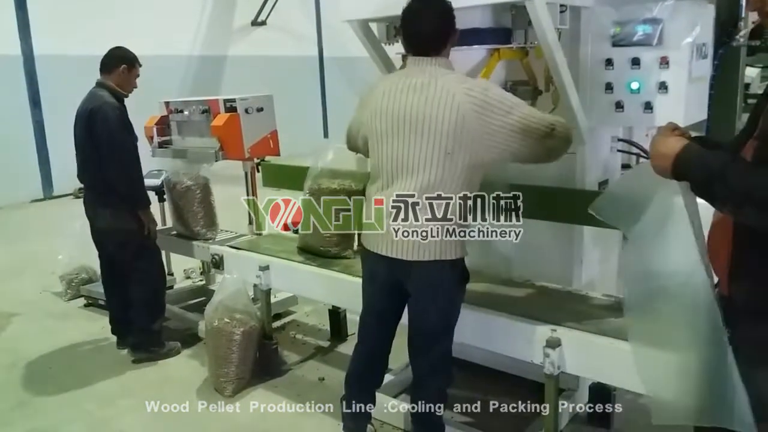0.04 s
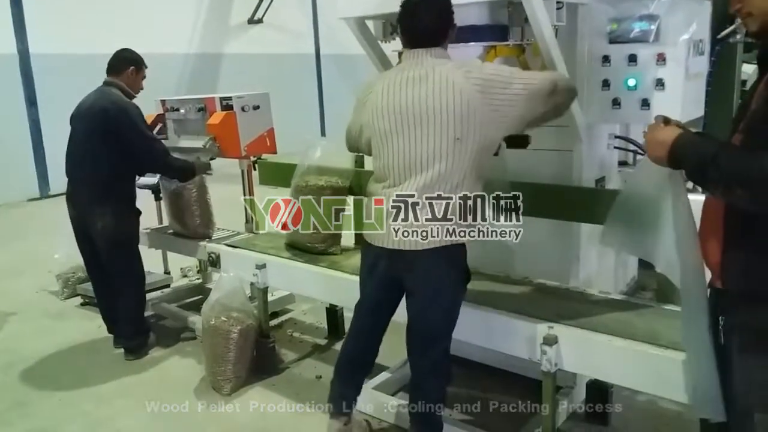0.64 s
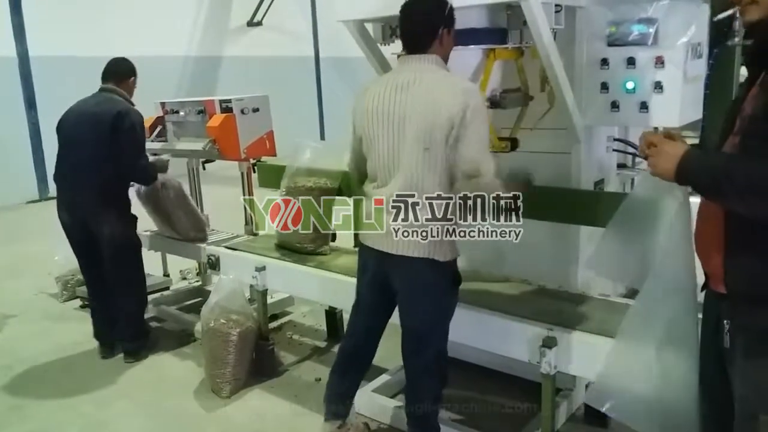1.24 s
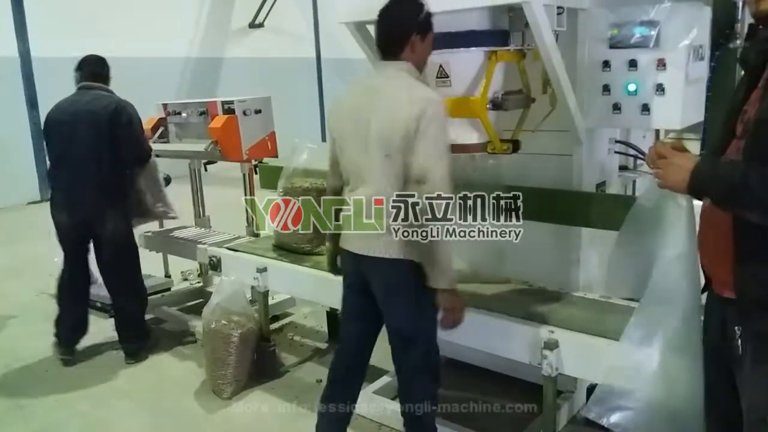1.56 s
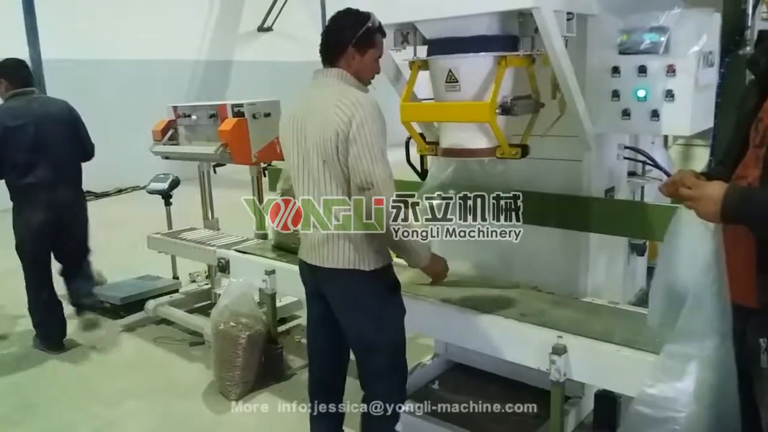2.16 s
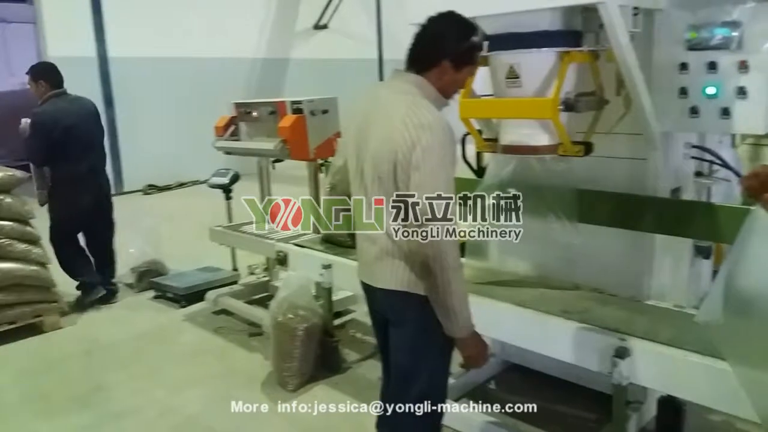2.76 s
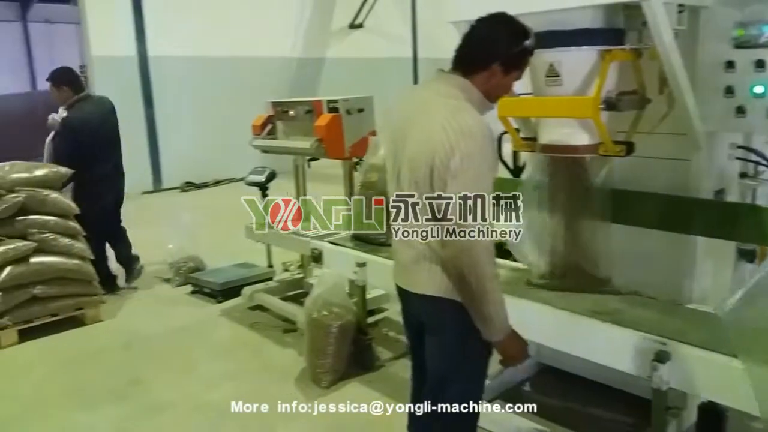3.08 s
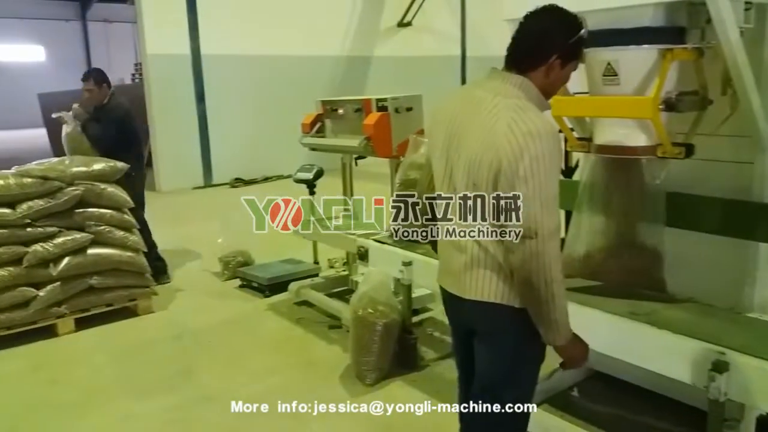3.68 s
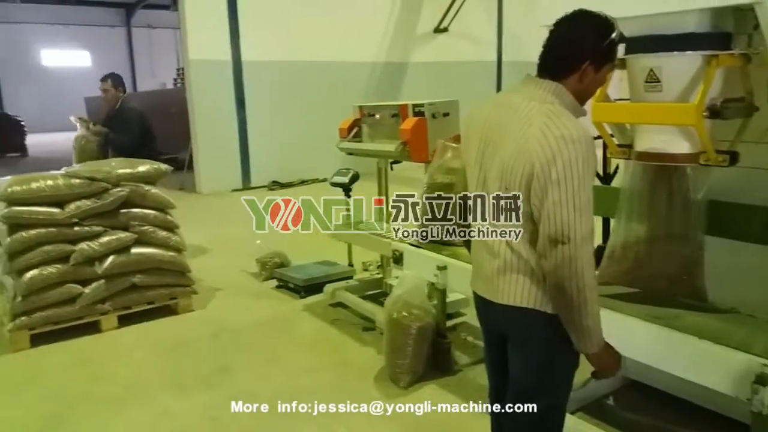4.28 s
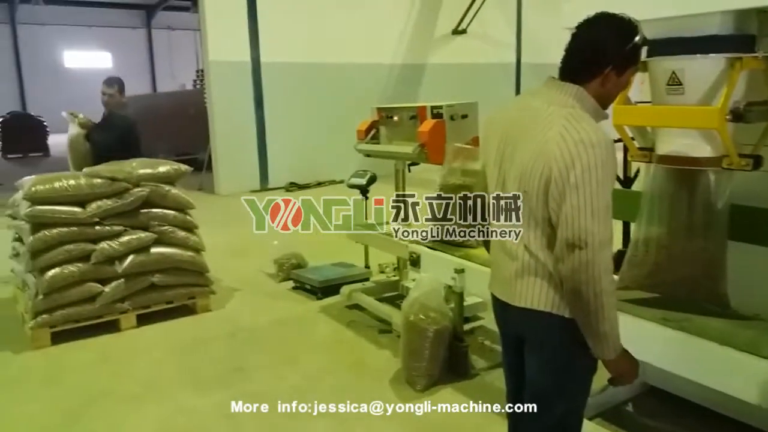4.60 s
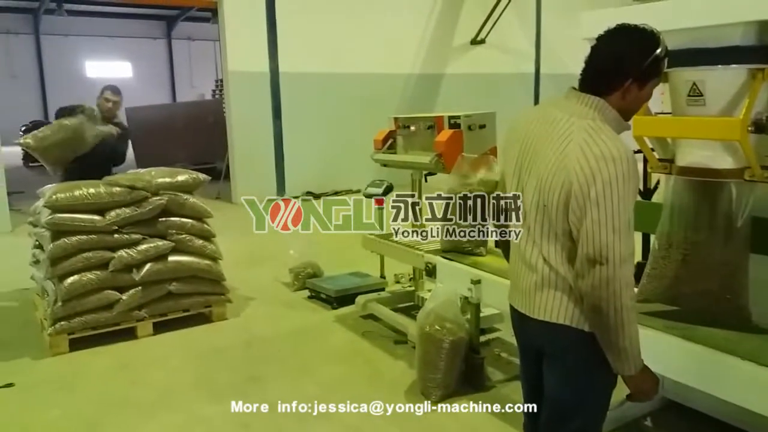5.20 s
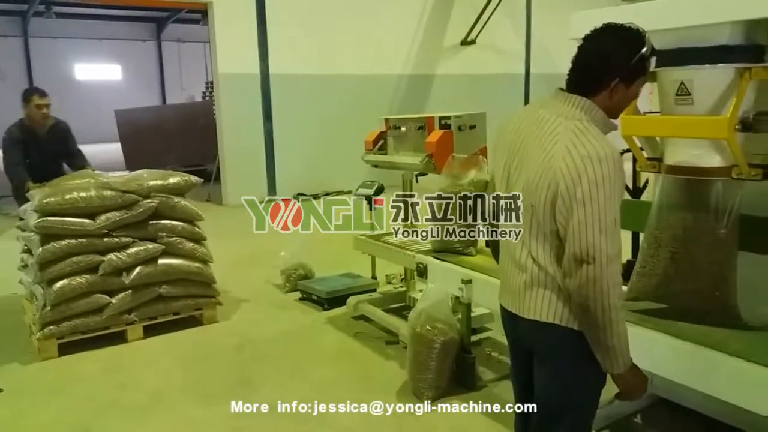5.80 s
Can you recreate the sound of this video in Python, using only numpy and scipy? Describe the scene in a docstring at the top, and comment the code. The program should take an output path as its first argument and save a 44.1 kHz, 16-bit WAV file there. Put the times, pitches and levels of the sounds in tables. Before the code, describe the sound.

Motors and fans drone steadily in a large factory hall. Close by, a plastic bag rustles briefly, and a bagging machine lets out a sharp hiss of air with a few dull knocks. After a second, shorter hiss, a metal gate clanks open and pellets drum into the empty bag. They keep rattling down a ringing steel chute in a loud, steady rush, until another clank comes at the very end.

```python
"""A large factory hall, motors droning all round, with a pellet bagging machine up close.
A plastic bag rustles and air valves blow off as the clamp grips it. The hopper gate clanks open
and the load drums into the empty bag. Pellets then keep rattling down the steel chute and set it
ringing, while the growing heap deadens the bag."""
import sys
import numpy as np
from scipy import signal
from scipy.fft import rfft, irfft
from scipy.io import wavfile
from scipy.ndimage import uniform_filter1d, minimum_filter1d

SR = 44100
rng = np.random.default_rng(int(sys.argv[2]) if len(sys.argv) > 2 else 0)


def persist_wave(psi):
    """Save psi, clipped to +-1, as 16-bit WAV."""
    counts = np.round(np.clip(psi, -1, 1) * 32767).astype(np.int16)
    wavfile.write(sys.argv[1], SR, np.atleast_2d(counts).T)


N = 257544
TIME = np.arange(N) / SR
GATE_OPEN_S = 2.561


def from_db(db):
    """Decibels to gain."""
    return 10 ** (np.asarray(db) / 20)


def unit_rms(x):
    """Scale to an rms of 1."""
    return x / np.sqrt(np.mean(x ** 2) + 1e-20)


def at_hz(points, hz):
    """Read a curve on a log-frequency axis."""
    freqs, values = np.transpose(points)
    return np.interp(np.log(np.maximum(hz, 1)), np.log(freqs), values)


def noise():
    """White noise."""
    return rng.standard_normal(N)


def drift(rate_hz):
    """Smooth random modulation with a spread of about 1."""
    step, warm_up = 40, 2000
    pole = np.exp(-2 * step * np.pi * rate_hz / SR)
    white = rng.standard_normal(N // step + warm_up + 2)
    slow = signal.lfilter([1], [1, -2 * pole, pole * pole], white)[warm_up:]
    return np.interp(np.arange(N) / step, np.arange(len(slow)), unit_rms(slow))


def colour(x, spectrum):
    """Minimum-phase EQ, so nothing rings ahead of a hit; rms 1."""
    size = 8192
    gains = from_db(at_hz(spectrum, np.fft.rfftfreq(size, 1 / SR)))
    cepstrum = irfft(np.log(gains))
    cepstrum[1:size // 2] *= 2
    cepstrum[size // 2 + 1:] = 0
    impulse = irfft(np.exp(rfft(cepstrum)))
    return unit_rms(signal.fftconvolve(x, impulse)[:N])


def resonate(x, modes):
    """Parallel resonators of alternating polarity, each at its own level; rms 1 in all."""
    out = 0
    for k, (hz, width, db) in enumerate(modes):
        pole = np.exp(-np.pi * width / SR)
        ring = signal.lfilter([1, 0, -1], [1, -2 * pole * np.cos(2 * np.pi * hz / SR), pole * pole], x)
        out = out + (-1) ** k * from_db(db) * unit_rms(ring)
    return unit_rms(out)


def treble_shelf(x, lift_db, corner_hz):
    """Gentle boost or cut above the corner."""
    low = signal.sosfilt(signal.butter(1, corner_hz, fs=SR, output="sos"), x)
    return low + from_db(lift_db) * (x - low)


def burst(start, rise, hold, decay):
    """Attack and decay envelope in seconds; the hold counts from the start."""
    age = TIME - start
    return np.clip(age / rise, 0, 1) * np.exp(-np.maximum(age - hold, 0) / decay)


def fade_in(rise_s):
    """Linear fade up from the moment the gate opens."""
    return np.clip((TIME - GATE_OPEN_S) / rise_s, 0, 1)


def settle(first, last, lag_s):
    """Glide from one value towards another once the gate is open."""
    return last + (first - last) * np.exp(-np.maximum(TIME - GATE_OPEN_S, 0) / lag_s)


def impacts(per_s, spread_db):
    """Clicks of random timing, strength and polarity."""
    sizes = from_db(spread_db * np.minimum(rng.exponential(1, N), 4.5)) * rng.choice([-1, 1], N)
    return sizes * (rng.random(N) < per_s / SR)


def housing(x, reflect_db, decay_s):
    """Steel panels close by add a dense, very short echo that ripples the spectrum; rms 1."""
    age = TIME[:SR // 10]
    tail = rng.standard_normal(len(age)) * np.exp(-age / decay_s) * (age > .001)
    echo = signal.fftconvolve(x, tail / np.sqrt(np.sum(tail ** 2)))[:N]
    return unit_rms(x + from_db(reflect_db) * echo)


def hall(x):
    """Diffuse reverb: each octave dies at its own rate, and the far walls return little treble."""
    # Each row: frequency in Hz, seconds to fall by 60 dB.
    reverb_times = [(100, 4.5), (700, 5.4), (2000, 4.2), (4000, 2.34), (8000, 0.4), (15000, 0.22)]
    age = TIME[:3 * SR]
    edges = np.geomspace(60, 16000, 9)
    tail = 0
    for low, high in zip(edges, edges[1:]):
        octave = signal.butter(2, [low, high], "band", fs=SR, output="sos")
        band = signal.sosfilt(octave, rng.standard_normal(len(age)))
        tail = tail + band * np.exp(-np.log(1000) * age / at_hz(reverb_times, np.sqrt(low * high)))
    tail = tail * np.clip(age / 0.024, 0, 1)
    echo = signal.fftconvolve(x, tail / np.sqrt(np.sum(tail ** 2)))[:N]
    return treble_shelf(echo, lift_db=-12.5, corner_hz=4500)


def machinery(start_db=-28.5, settled_db=-32, ease_s=2.2, waver_db=2.0, wander_hz=1.99):
    """Fans and motors: a bed of roar that eases to a steady level, with wavering tones."""
    # EQ of the roar. Each row: frequency in Hz, relative level in dB.
    roar_eq = [(25, -55), (40, -14), (55, -5), (80, -3), (250, -2.5), (370, -9.5), (630, -10.5),
               (1100, -11), (2600, -14), (3700, -23.5), (5200, -27.5), (7000, -39.5), (9000, -59),
               (14000, -100)]
    # Each row: pitch in Hz, rms level in dB.
    motor_tones = [(156.1, -45), (188.4, -41), (250, -44), (535, -54), (640.6, -53), (842, -53),
                   (1412, -55), (1523, -54)]
    eased = np.minimum(TIME / ease_s, 1) ** 2
    roar = from_db(start_db + (settled_db - start_db) * eased) * colour(noise(), roar_eq)
    hum = 0
    for hz, db in motor_tones:
        level = from_db(db + waver_db * drift(7.4))
        cycles = np.cumsum(hz + wander_hz * drift(3.94)) / SR
        hum = hum + level * np.sin(2 * np.pi * cycles)
    return roar + np.sqrt(2) * hum


def groan(hz=594, width_hz=6, level_db=-36.5):
    """A hollow note swells in the machine after the clamp has closed and slowly dies away."""
    note = resonate(noise(), [(hz, width_hz, 0)])
    return from_db(level_db) * note * burst(start=0.67, rise=0.26, hold=0.26, decay=0.53)


def frame():
    """The frame shudders when a cylinder strokes or the load lands."""
    # EQ of the rumble. Each row: frequency in Hz, relative level in dB.
    rumble_eq = [(28, -51), (55, 1), (90, 11), (140, -6), (300, 0.5), (450, -14), (610, -11.5), (1100, -30),
                 (2500, -89)]
    # Each row: start in seconds, level in dB, rise and decay in seconds.
    shudders = [(.9, -29, 0.021, 0.35), (2.41, -25, 0.0064, 0.12), (2.68, -21, 0.089, 0.056),
                (5.74, -33, 0.021, 0.064)]
    envelope = sum(from_db(db) * burst(s, rise, rise, decay) for s, db, rise, decay in shudders)
    return colour(noise(), rumble_eq) * envelope


def plastic(ring_hz=2160, ring_width_hz=90, ring_db=-14.0):
    """The film crackles in dense little snaps, with a faint ring, as a bag is handled."""
    # EQ of the crackle. Each row: frequency in Hz, relative level in dB.
    film_eq = [(250, -5), (400, 10.5), (600, -7.5), (900, -17), (1250, -11.5), (2100, 5), (3400, 1),
               (4200, 2.5), (5300, -1.5), (6200, -12), (7800, -16.5), (10500, -35), (12600, -21),
               (15500, -34)]
    # Each row: start and length in seconds, level in dB.
    rustles = [(0, 0.096, -30), (0.117, 0.029, -36), (0.176, 0.018, -38.5), (0.294, 0.026, -46),
               (0.387, .02, -47), (.49, 0.022, -47), (1.856, 0.011, -43.5)]
    snaps = colour(impacts(7000, spread_db=4.0), film_eq)
    crackle = unit_rms(snaps + from_db(ring_db) * resonate(snaps, [(ring_hz, ring_width_hz, 0)]))
    return crackle * sum(from_db(db) * burst(s, 0.0017, length, 0.021) for s, length, db in rustles)


def air_valves(ports_db=-4.0, flutter_db=0.5, whistle_db=-24):
    """Jets of compressed air excite the valve ports; a valve whistles as the first blast runs out."""
    # EQ of the escaping air. Each row: frequency in Hz, relative level in dB.
    hiss_eq = [(300, -3.5), (720, 1), (1170, -6.5), (1900, 2.5), (2300, -0.5), (2750, 2), (4300, -5),
               (5200, -7.5), (6000, -8), (7300, -19), (8900, -22.5), (9600, -29.5), (10700, -48.5),
               (11900, -32), (13500, -35), (15200, -28)]
    # Resonances of ports and whistle. Each row: pitch and width in Hz, relative level in dB.
    port_modes = [(2030, 240, 4.5), (2650, 210, 1.5), (2900, 260, -3.5), (3190, 90, -9), (4810, 180, -3),
                  (5300, 130, -0.5), (5900, 200, -4), (6600, 80, -14), (8250, 90, -20), (9260, 60, -20)]
    whistle_modes = [(2520, 90, -2.5), (5150, 110, -2)]
    # Each row: start and length in seconds, level in dB, growth in dB a second, treble lift in dB.
    exhausts = [(0.618, 0.19, -21.5, 8.5, 1.5), (0.815, 0.049, -22.5, 6, -22),
                (2.409, 0.04, -26.5, -8, 1.5), (2.452, 0.089, -31, -15, -26)]
    hiss = housing(colour(noise(), hiss_eq), reflect_db=-25, decay_s=0.02)
    ports = from_db(ports_db) * resonate(colour(noise(), hiss_eq), port_modes)
    jet = unit_rms(hiss + ports) * from_db(flutter_db * drift(25))
    whistle = from_db(whistle_db) * resonate(colour(noise(), hiss_eq), whistle_modes)
    out = whistle * burst(start=0.815, rise=0.017, hold=0.026, decay=0.015)
    for s, length, db, growth, lift_db in exhausts:
        flow = from_db(db + growth * np.clip(TIME - s, 0, length)) * burst(s, 0.018, length, 0.013)
        out = out + flow * treble_shelf(jet, lift_db, corner_hz=4970)
    return out


def gate():
    """Each clank is a quick clatter of contacts that rings the hopper gate."""
    # Each row: pitch and width in Hz, relative level in dB.
    gate_modes = [(181, 87, -1.5), (400, 320, -1.5), (830, 130, -7.5), (1940, 270, -5.5), (2870, 470, -5),
                  (5340, 2000, -10.5)]
    # Each row: start in seconds, level in dB, decay in seconds, treble lift in dB.
    clanks = [(2.558, -11.5, 0.029, -15), (2.606, -17, 0.014, 10), (2.65, -19, 0.058, -15),
              (5.827, -8, .03, 0)]
    # Each row: frequency in Hz, relative level in dB.
    strike_eq = [(100, 13.0), (5500, -12.5), (10000, -27), (15000, -52)]
    clatter = resonate(colour(impacts(3000, spread_db=-6.5), strike_eq), gate_modes)
    out = 0
    for s, db, decay, lift_db in clanks:
        envelope = from_db(db) * burst(s, 0.0054, 0.013, decay)
        out = out + envelope * treble_shelf(clatter, lift_db, corner_hz=2500)
    return out


def thuds(rise_s=0.0095, focus_db_per_octave=40):
    """Heavy blows ring the hopper's low modes; where a blow lands decides which mode speaks most."""
    # Each row: pitch in Hz, relative level in dB, decay in seconds.
    hopper_modes = [(99, -5, 0.025), (159.4, -11, 0.019), (199.5, 1, 0.024), (248, 3, .012),
                    (395, -4.5, 0.033), (562, 0.5, 0.014), (660, 0, 0.023), (796, -4, 0.023)]
    # Clamp, gate and falling load. Each row: start in seconds, strength in dB, favoured pitch in Hz.
    blows = [(0.538, -26.5, 643), (0.548, -22.5, 400), (0.829, -19, 100), (0.83, -21, 645),
             (0.835, -21, 785), (0.905, -22, 100), (0.975, -21, 100), (1.035, -18, 100), (2.47, -30, 150),
             (2.514, -23, 200), (2.56, -8, 804), (2.605, -2.5, 185), (2.611, -17, 400), (2.647, -8, 600),
             (2.664, -6, 150), (2.69, -15, 400), (2.736, -16, 208), (2.766, -12, 410), (2.81, -16, 790),
             (2.827, -11, 99), (2.95, -18, 187), (5.749, -23, 254), (5.795, -20, 171), (5.829, -2, 203)]
    out = 0
    for hz, mode_db, decay in hopper_modes:
        for s, db, pitch in blows:
            gain = from_db(db + mode_db - focus_db_per_octave * abs(np.log2(hz / pitch)))
            tone = np.sin(2 * np.pi * hz * (TIME - s))
            out = out + gain * burst(s, rise_s, rise_s, decay) * tone
    return out


def bag(empty_db=-13.5, filled_db=-26.5, fill_s=0.6, lumps_db=1.5):
    """Clumps of pellets drum on the bag; the growing heap deadens its boom."""
    # EQ of the bag, empty and part filled. Each row: frequency in Hz, relative level in dB.
    empty_eq = [(35, -63), (60, -14), (105, 4.5), (160, 10), (215, 4.5), (290, 4), (390, 3.5), (480, -6),
                (650, 1), (830, 4.5), (1000, -5), (1400, -6.5), (3000, -91.5)]
    filled_eq = [(40, -60.5), (90, -2.5), (150, -2), (320, 7.5), (450, 2.5), (580, 1.5), (860, 1.5),
                 (1100, -2.5), (1400, -4.5), (3000, -64.5)]
    emptiness = np.exp(-np.maximum(TIME - GATE_OPEN_S - .3, 0) / fill_s)
    landing = fade_in(0.14)   # the boom builds as the load reaches the bottom
    boom = np.sqrt(emptiness * landing) * colour(impacts(4000, spread_db=1.5), empty_eq)
    patter = np.sqrt(1 - emptiness) * colour(impacts(5000, spread_db=3.0), filled_eq)
    level_db = settle(empty_db, filled_db, lag_s=1.175) + lumps_db * drift(1.2)
    return (boom + patter) * from_db(level_db)


def stray_pellets(level_db=-47):
    """At full flow single pellets hit the rim of the spout with a short tick."""
    # EQ of a tick. Each row: frequency in Hz, relative level in dB.
    tick_eq = [(1500, -8), (3000, 9), (5500, 11.5), (7500, 3), (9500, -3), (10800, -38), (12400, -6),
               (13500, -26), (16000, -51)]
    # Each row: time in seconds, relative strength in dB.
    strays = [(3.3194, -23), (3.6252, -21.5), (3.7594, -21), (4.0686, -24), (4.1594, -23), (4.3894, -21.5),
              (4.439, -17.5), (4.7394, -23), (4.791, -24), (4.8794, -19), (4.9994, -23), (5.1094, -22),
              (5.1507, -19), (5.2194, -22), (5.288, -19), (5.6494, -20)]
    hits = np.zeros(N)
    for s, db in strays:
        hits[int(s * SR)] = from_db(db)
    return from_db(level_db) * housing(colour(hits, tick_eq), reflect_db=13.0, decay_s=0.0062)


def flow_db(full_at_s=2.98, rise_s=0.052, thin_db=-1, sag_db_per_s=-0.86):
    """Level ride of the stream on the chute: thin, then full, sagging as the hopper empties."""
    # Clumps slide down as the flow builds. Each row: centre and half length in seconds, boost in dB.
    clumps = [(2.85, 0.012, 2), (3.006, 0.12, 3)]
    thin = .5 - .5 * np.tanh((TIME - full_at_s) / rise_s)
    bumps_db = sum(db * np.exp(-((TIME - s) / half_length) ** 2) for s, half_length, db in clumps)
    return thin_db * thin + sag_db_per_s * np.maximum(TIME - full_at_s, 0) + bumps_db


def pellet_contacts(per_s, spread_db):
    """The force of wooden pellets landing, too soft for the highest treble."""
    # Each row: frequency in Hz, relative level in dB.
    contact_eq = [(7000, 2), (9500, -2), (11000, -22), (15000, -35)]
    return colour(impacts(per_s, spread_db), contact_eq)


def chute_ring(ring_hz=2014, width_hz=3.2, ring_db=-31, wander_hz=3.45):
    """The stream keeps the chute's strongest mode singing; single ringing tones swell and fade."""
    # Each row: start and length in seconds, rms level in dB, pitch of the mode in Hz.
    ring_swells = [(2.81, 0.018, -23, 2014), (2.956, 0.032, -25, 2014), (3.044, .02, -31, 2014),
                   (3.09, 0.028, -31, 2014), (3.17, .025, -27, 2014), (3.235, 0.052, -24, 2014),
                   (3.37, 0.026, -23.5, 2014), (3.49, 0.034, -20.5, 2014), (3.58, 0.069, -31, 1394),
                   (3.622, 0.15, -30.5, 2014), (3.783, .04, -29, 2627), (3.888, 0.08, -23, 2014),
                   (4.02, 0.035, -30, 2627), (4.254, 0.05, -21.5, 2014), (4.404, 0.066, -29, 2627),
                   (4.5, 0.058, -26, 1460), (4.632, 0.034, -21.5, 2014), (4.91, 0.033, -25, 2014),
                   (4.923, 0.092, -24, 2627), (5.12, 0.037, -25, 2014), (5.33, 0.052, -32.5, 1394),
                   (5.333, 0.045, -21.5, 2014), (5.395, 0.19, -30.5, 1869), (5.583, 0.1, -22, 2014)]
    steady = resonate(pellet_contacts(7600, spread_db=1.5), [(ring_hz, width_hz, 0)]) * fade_in(0.97)
    phase_wander = np.cumsum(wander_hz * drift(29.3)) / SR
    tones = 0
    for s, length, db, hz in ring_swells:
        envelope = from_db(db) * burst(s, rise=0.0097, hold=length, decay=0.063)
        tones = tones + envelope * np.sin(2 * np.pi * (hz * TIME + phase_wander))
    return from_db(ring_db + flow_db()) * steady + np.sqrt(2) * tones


def chute(rattle_db=-16.5, modes_db=-20.5, surge_db=0.7):
    """Thousands of pellets a second tick on the steel and keep its many modes ringing."""
    # EQ of the ticks. Each row: frequency in Hz, relative level in dB.
    rattle_eq = [(700, -21), (1250, -10), (1500, -1), (2300, 1), (3100, -1.5), (3400, -4), (3850, -3.5),
                 (4350, -7.5), (5300, -5), (6400, -15.5), (7300, -20.5), (9300, -24.5), (10700, -56.5),
                 (12000, -85), (15000, -81)]
    # Each row: pitch and width in Hz, relative level in dB.
    steel_modes = [(1394, 4, -4), (1460, 5, 0), (1810, 36, 2), (1869, 5, -2.5), (1954, 4, -3.5),
                   (2123, 9, -2), (2250, 10, -6), (2431, 8, -3), (2491, 7, -2.5), (2578, 18, 1),
                   (2627, 9, 2.5), (2700, 25, -3), (2827, 9, -4), (2949, 10, -4.5), (3010, 30, -4),
                   (3105, 20, -5.5), (3760, 80, -2), (3900, 70, -4), (4890, 110, -6), (5270, 50, -4.5),
                   (5448, 30, -7), (6060, 110, -8), (6733, 25, -16)]
    ticks = colour(impacts(12000, spread_db=1.5), rattle_eq)
    ticks = housing(ticks, reflect_db=-14.0, decay_s=0.0049)
    hardness_db = settle(-10.5, 2.5, lag_s=0.74)   # soft at first, while pellets fall on slack film
    arrival = fade_in(0.084)   # the first pellets need a moment to reach the wall
    rattle = from_db(rattle_db) * arrival * treble_shelf(ticks, hardness_db, corner_hz=2960)
    swell = fade_in(0.74)   # the modes build up as the stream spreads over the wall
    ringing = from_db(modes_db) * swell * resonate(pellet_contacts(9000, spread_db=2.5), steel_modes)
    return (rattle + ringing) * from_db(flow_db() + surge_db * drift(32))


def scene():
    """Mono mix on two channels; air, clanks and rustle feed the hall reverb."""
    stream = fade_in(0.0079) * (chute() + bag()) + chute_ring() + stray_pellets()
    air, clanks, rustle = air_valves(), gate(), plastic()
    echo = hall(from_db(-4.5) * air + from_db(-6.0) * clanks + from_db(-3.0) * rustle)
    mono = machinery() + stream + air + clanks + rustle + frame() + thuds() + groan() + echo
    return np.array([mono, mono])


def record(dry):
    """Roll off the deep bass, hold the highest peaks with a fast limiter and cut the very top."""
    low_cut_hz, high_cut_hz, ceiling = 46, 15800, .92
    lean = signal.sosfilt(signal.butter(4, low_cut_hz, "high", fs=SR, output="sos"), dry)
    allowed = ceiling / np.maximum(np.abs(lean), ceiling)
    gain = uniform_filter1d(minimum_filter1d(allowed, size=129), size=129)
    return signal.sosfilt(signal.ellip(10, .1, 90, high_cut_hz, fs=SR, output="sos"), lean * gain)


dry = scene()
out = record(dry)
persist_wave(out)
```